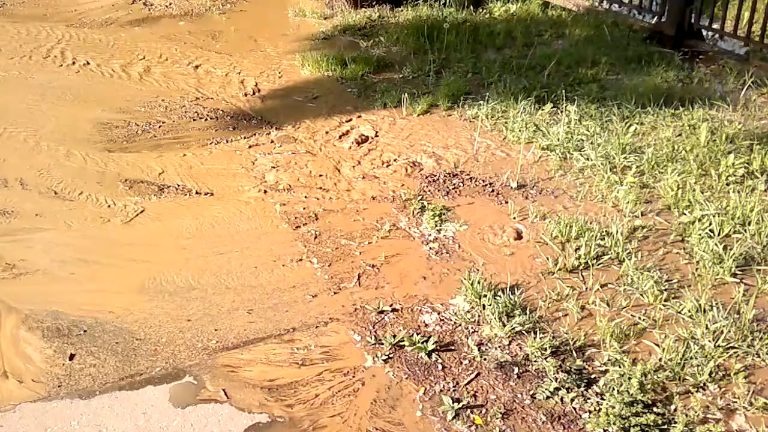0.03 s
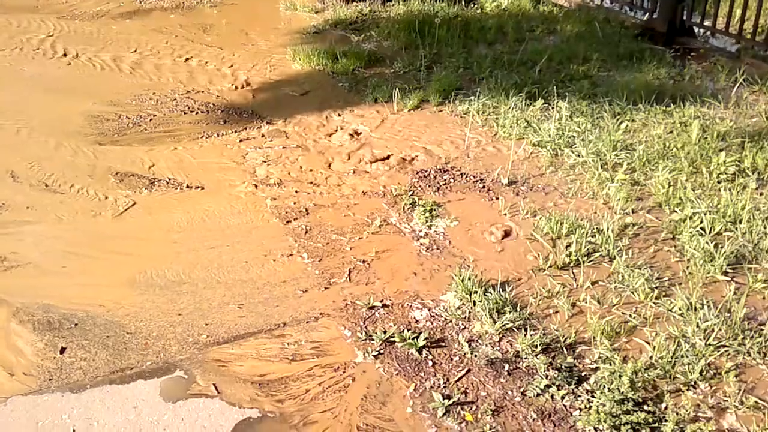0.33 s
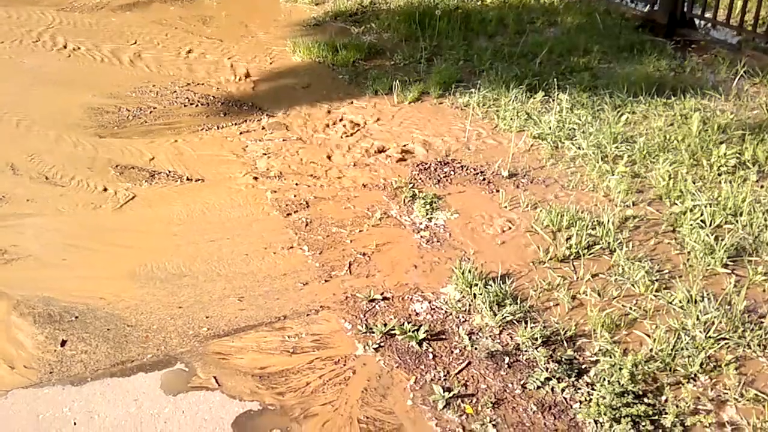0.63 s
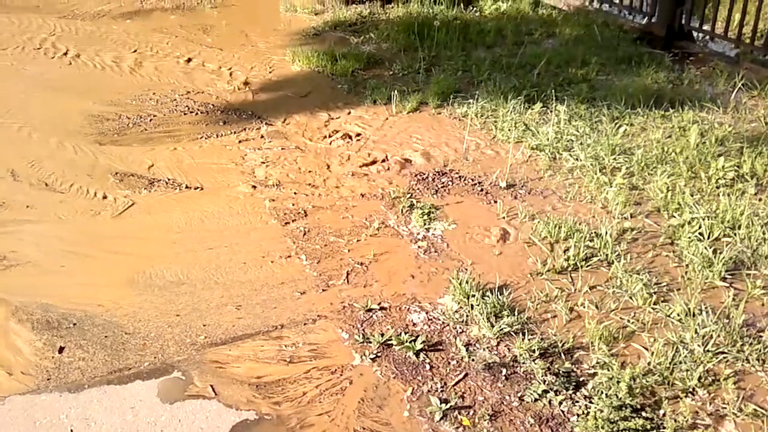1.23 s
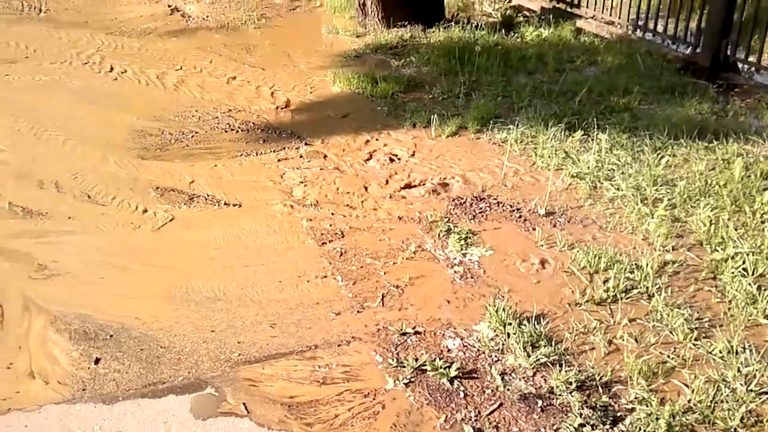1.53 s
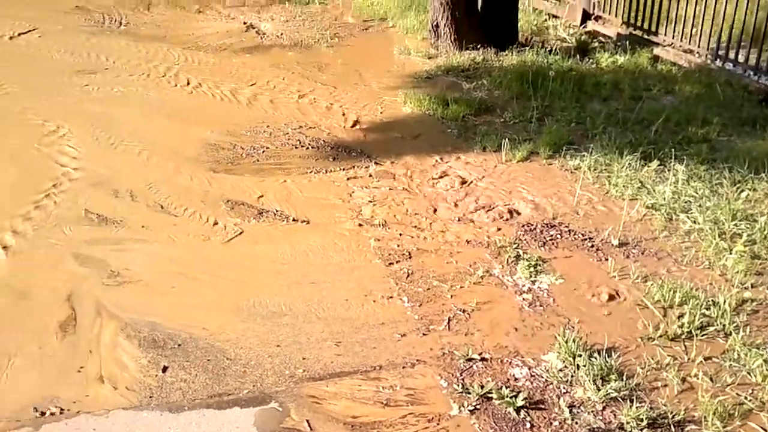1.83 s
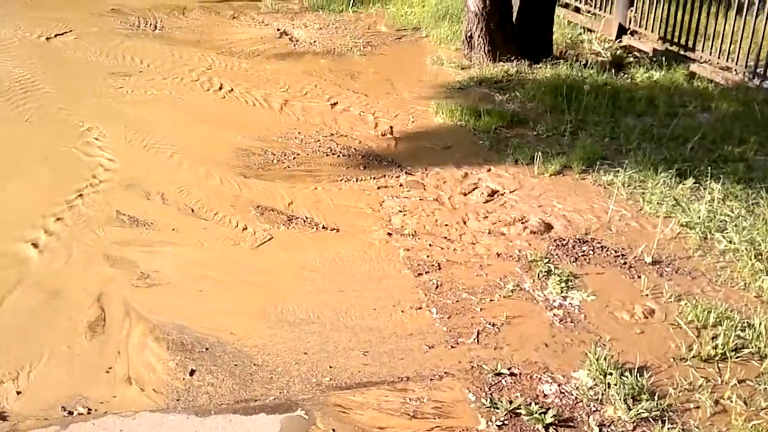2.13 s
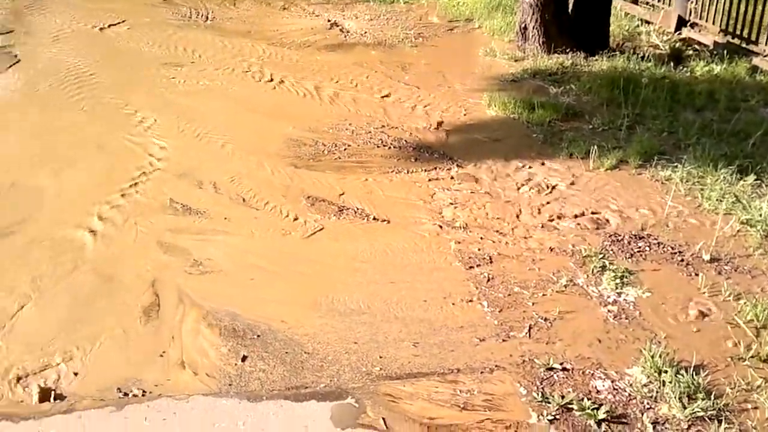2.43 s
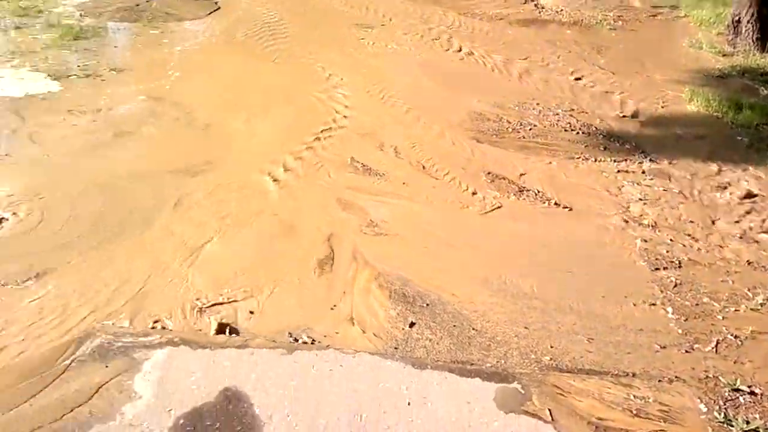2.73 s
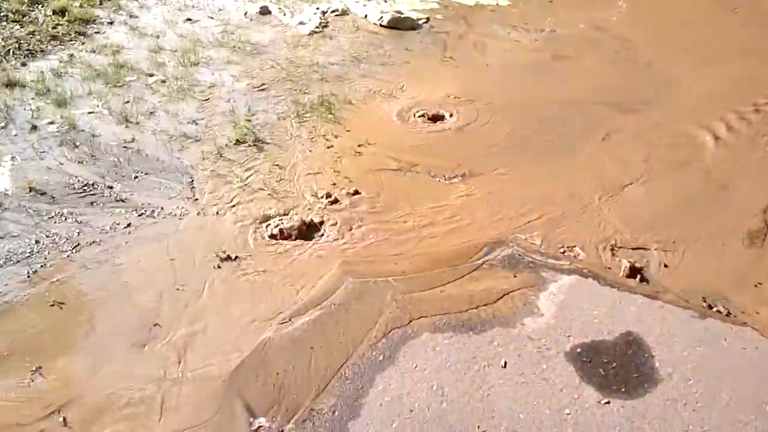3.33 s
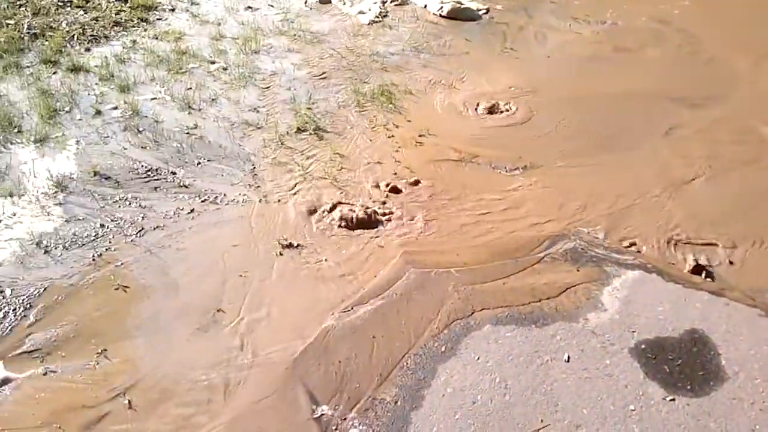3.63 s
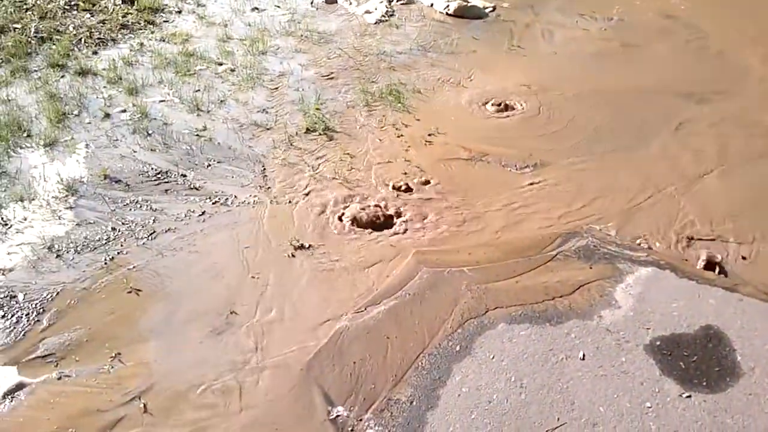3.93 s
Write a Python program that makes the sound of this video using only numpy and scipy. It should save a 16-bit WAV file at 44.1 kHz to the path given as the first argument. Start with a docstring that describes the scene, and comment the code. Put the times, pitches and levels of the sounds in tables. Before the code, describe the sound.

Muddy water wells up with a steady bubbling rush, over distant traffic rumble.

```python
"""Muddy water wells up and runs over flooded ground. Countless tiny bubbles, each ringing for an
instant, blend into a rush, with a few clear plips and wet spits on top. The water grows louder and
brighter as the microphone turns toward the welling spot. Behind it distant traffic rumbles and an
engine hum comes up late. Close by there are a few faint, crisp rustles."""
import sys
import numpy as np
from scipy import signal
from scipy.fft import rfft, irfft, next_fast_len
from scipy.io import wavfile
from scipy.ndimage import uniform_filter1d, map_coordinates

SR = 44100
rng = np.random.default_rng(int(sys.argv[2]) if len(sys.argv) > 2 else 0)


def materialize(psi):
    """Save the field psi as 16-bit PCM at rate SR to the path in sys.argv[1].

    A 1-D psi becomes a single channel; in a 2-D psi each row is a channel.
    """
    bounded = np.clip(np.atleast_2d(psi).T, -1, 1)
    quanta = np.round(bounded * 32767).astype(np.int16)
    wavfile.write(sys.argv[1], SR, quanta)


N = 176400  # 4 seconds

# Levels in the tables are relative: the functions add gains and filters.
# How loud the traffic is over time: t/s, rumble level/dB, roar level/dB
TRAFFIC_LEVELS = [(.3, -33, -39.5), (.55, -32, -37), (.75, -29.5, -37), (1.1, -32, -36.5),
                  (1.3, -29.5, -33), (1.45, -32, -34.5), (1.6, -29, -37.5), (2.05, -30.5, -35.7),
                  (2.35, -32.5, -35.5), (2.75, -32, -38.5), (3.1, -32, -35.5), (3.7, -29.5, -35),
                  (4.0, -33, -36.5)]
# Tone of the deep traffic rumble: f/Hz, level/dB
RUMBLE_SPECTRUM = [(5, -62), (12, -17), (20, 4), (32, -7.5), (43, 7), (54, 9), (68, 9), (78, 3.5), (135, 4),
                   (175, -12.5), (350, -58), (1200, -120)]
# Tone of the tyre and engine roar: f/Hz, level/dB
ROAR_SPECTRUM = [(20, -70), (90, -14.5), (170, 0.5), (260, -1), (330, -6), (450, -9.5), (600, -15.5),
                 (900, -37), (2000, -58), (4000, -120)]
# Engine notes: f/Hz, level/dB, swell t/s, fade t/s, pitch rise/(Hz per s)
ENGINE_NOTES = [(219, -36.5, 3.35, 4.5, 1.8), (249, -43, 3.35, 3.9, 4), (358.7, -46.5, 2.7, 3.51, 13.8)]
# Faint rustles: t/s, half length/s, level/dB, centre f/Hz
RUSTLE_EVENTS = [(.745, 0.018, -78, 12000), (.882, .02, -75, 10900), (1.217, .016, -70, 13500),
                 (1.47, .045, -79, 11000), (2.015, 0.017, -76, 11000), (3.196, 0.022, -66, 10400)]
# Single ticks in the rustles: t/s, level/dB
TICK_EVENTS = [(.8787, -63), (1.2012, -66), (1.2168, -61), (2.003, -66), (2.0207, -65), (3.1546, -63),
               (3.1735, -53), (3.1943, -54), (3.203, -51), (3.2092, -58)]
# Tone of the ticks and droplets: f/Hz, level/dB
TICK_SPECTRUM = [(3000, -40), (6000, -1), (9500, -5.5), (11500, 0), (13000, -8), (15000, -25)]
# How loud the droplets are over time: t/s, level/dB
SPATTER_LEVELS = [(.55, -94), (1.4, -87), (2.4, -83), (3.0, -82.5), (3.5, -91), (4.0, -94)]
# Bursting bubbles: t/s, level/dB
SPIT_EVENTS = [(.5508, -54), (0.878, -51), (1.094, -59), (1.609, -51), (2.143, -54), (2.323, -59),
               (2.588, -50), (2.606, -52), (2.675, -58), (2.91, -52), (3.174, -55), (3.334, -57),
               (3.627, -45.5), (3.785, -49), (3.81, -47.5)]
# Tone of a bursting bubble: f/Hz, level/dB
SPIT_SPECTRUM = [(500, -64), (1500, -30), (3200, 12), (5400, -7), (6500, -9), (8000, -19), (11000, -34),
                 (15000, -54)]
# Clear single bubbles: t/s, starting f/Hz, level/dB, life/s
PLIP_EVENTS = [(.424, 680, -35.5, 0.044), (.487, 2580, -36, .012), (.5508, 2900, -28.5, 0.0047),
               (0.704, 3000, -30, 0.0035), (0.8323, 2320, -31.5, 0.013), (1.1918, 2520, -33, 0.0072),
               (1.201, 3130, -35.5, 0.0071), (1.3695, 2700, -31.5, 0.007), (1.387, 3400, -39.5, 0.013),
               (1.507, 5570, -47, 0.0033), (1.596, 3060, -35, .006), (1.766, 2240, -31, 0.0088),
               (1.87, 3700, -46, 0.0081), (1.934, 2770, -34, 0.01), (2.666, 3300, -37, .004),
               (2.932, 2540, -31, 0.0064), (3.144, 3330, -35, 0.0048), (3.222, 2880, -37, 0.0077),
               (3.939, 4640, -34.5, 0.0078)]
# How loud the water is over time: t/s, rush level/dB, babble level/dB, fizz level/dB
WATER_LEVELS = [(.3, -42.5, -42, -62.5), (.55, -43.5, -42.5, -61.5), (1.05, -42.5, -42.5, -61),
                (1.5, -42.8, -42.5, -61), (1.88, -43, -42.5, -60.5), (2.2, -41, -42, -59.5),
                (2.5, -42, -42, -58.5), (2.8, -40.8, -42, -58.5), (3.05, -41, -39.5, -57),
                (3.4, -39.5, -40, -57), (3.6, -39, -41, -55.5), (3.82, -39.5, -40, -55),
                (4.0, -39, -42, -56.5)]
# Tone of the water's low rush: f/Hz, level/dB
RUSH_SPECTRUM = [(60, -60), (250, -9), (500, -2.5), (720, -3.5), (1020, 1), (1350, -2.5), (1700, -11.5),
                 (2300, -28), (4000, -54), (7000, -120)]
# Tone of its brighter babble: f/Hz, level/dB
BABBLE_SPECTRUM = [(200, -120), (700, -17), (1200, -8.5), (1600, 0.5), (2150, -1), (2600, -4.5),
                   (3200, -14), (4000, -30), (6000, -48), (9000, -120)]
# Tone of its high fizz: f/Hz, level/dB
FIZZ_SPECTRUM = [(600, -120), (1500, -33), (3000, 1), (4000, -1.5), (5000, -1), (5550, -8), (6050, -19),
                 (7500, -20), (8500, -27.5), (9600, -28), (11200, -26), (13500, -31), (15500, -44)]

RUMBLE_DB, ROAR_DB, TICK_DB, SPIT_DB, PLIP_DB = 1.37, .5, 11, 11.5, 5.5
RUSH_DB, BABBLE_DB, FIZZ_DB = -.5, -1, 1.5  # gains of the noise in the water
FROTH_DB, SPRAY_DB = -7, -6.5  # gains of the bubbles in it
BUBBLE_RISE = .096  # a bubble's pitch climbs by this fraction over its life
START_S, FADE_IN_S, FADE_OUT_S, TOP_HZ = .2689, .034, .002, 15650


def amp(db):
    """Turn decibels into a number to multiply by."""
    return 10 ** (np.asarray(db) / 20)


def unit(x):
    """Scale to an average strength (rms) of 1."""
    return x / np.sqrt(np.mean(x ** 2) + 1e-20)


def clock():
    """The time of each sample in seconds."""
    return np.arange(N) / SR


def curves(rows):
    """Join a table's points in time with straight lines, one curve per level column."""
    times, *columns = np.transpose(rows)
    return [np.interp(clock(), times, column) for column in columns]


def wobble(per_s):
    """A smooth curve through per_s random values a second."""
    return map_coordinates(rng.standard_normal(int(N * per_s / SR) + 4), [clock() * per_s])


def filtered(x, response):
    """Scale each frequency in x by response(hz)."""
    size = next_fast_len(N + SR // 2)
    return irfft(rfft(x, size) * response(np.fft.rfftfreq(size, 1 / SR)), size)[:N]


def coloured(x, spectrum):
    """Shape the tone of x with a table of f/Hz, level/dB."""
    f, db = np.transpose(spectrum)
    return filtered(x, lambda hz: amp(np.interp(np.log(hz + 1), np.log(f), db)))


def noise(spectrum, patchy_db):
    """Shaped noise with random louder and softer patches across pitch and time."""
    slices = signal.stft(rng.standard_normal(N), nperseg=512)[2]
    patches = uniform_filter1d(rng.standard_normal(slices.shape), 6, axis=0)
    patches = unit(uniform_filter1d(patches, 10, axis=1))
    uneven = signal.istft(slices * amp(patchy_db * patches), nperseg=512)[1][:N]
    return unit(coloured(uneven, spectrum))


def snaps(rows, rise_s, fall_s):
    """A burst of noise for each row of t/s, level/dB; it falls 60 dB in fall_s."""
    envelope = np.zeros(N)
    for start, db in rows:
        age = np.maximum(clock() - start, 0)
        envelope += (1 - np.exp(-age / rise_s)) * amp(db - 60 * age / fall_s)
    return envelope * rng.standard_normal(N)


def bubbles(starts, hz, gain, life):
    """Each bubble rings as a tone that starts softly, climbs and falls 40 dB over its life."""
    samples = np.arange(min(int(life.max() * SR) + 2, SR // 40))
    t, hz, life = samples / SR, hz[:, None], life[:, None]
    tone = np.sin(2 * np.pi * hz * t * (1 + BUBBLE_RISE * t / life / 2))
    ring = gain[:, None] * tone * (1 - np.exp(-t * hz)) * 10 ** (-2 * t / life)
    positions = (starts * SR).astype(int)[:, None] + samples
    return np.bincount(positions.ravel(), ring.ravel(), N)[:N]  # add each ring at its own time


def swarm(per_s, low_hz, high_hz, cycles, spread_db):
    """Many tiny rings of random time, pitch and strength, each about `cycles` vibrations long."""
    when, pitch, size, length = rng.random((int(per_s * N / SR), 4)).T
    hz = low_hz * (high_hz / low_hz) ** pitch
    gain = amp(-spread_db * np.log(1 - .98 * size)) * hz / high_hz  # many weak, a few strong
    return bubbles(when * N / SR, hz, gain, life=cycles * (.5 + length) / hz)


def traffic():
    """Far-off tyres and engines blur into a deep rumble and a low roar."""
    rumble_db, roar_db = curves(TRAFFIC_LEVELS)
    rumble = amp(rumble_db + RUMBLE_DB) * noise(RUMBLE_SPECTRUM, patchy_db=-.5)
    roar = amp(roar_db + ROAR_DB) * noise(ROAR_SPECTRUM, patchy_db=.66)
    return rumble + roar


def engine_hum(swell_s=.22):
    """Distant engine notes swell, creep up in pitch and fade."""
    t, hum = clock(), np.zeros(N)
    waver = 1 + .007 * wobble(6)
    for hz, db, start, end, rise in ENGINE_NOTES:
        pitch = (hz + rise * (t - start)) * waver
        note = np.sqrt(2) * np.sin(2 * np.pi * np.cumsum(pitch) / SR)
        swell = (1 + np.tanh((t - start) / swell_s)) / 2
        fade = (1 - np.tanh((t - end) / swell_s)) / 2
        hum += amp(db + wobble(5.34)) * swell * fade * note
    return hum


def rustles(width_hz=2900):
    """Brief clusters of tiny high crackles, each around its own pitch."""
    crackle = swarm(per_s=2200, low_hz=6000, high_hz=15000, cycles=2, spread_db=3.5)
    sound = np.zeros(N)
    for middle, half_s, db, centre_hz in RUSTLE_EVENTS:
        band = filtered(crackle, lambda hz: np.exp(-.5 * ((hz - centre_hz) / width_hz) ** 2))
        swell = np.exp(-.5 * ((clock() - middle) / half_s) ** 2)
        sound += amp(db) * swell * unit(band)
    return sound


def ticks():
    """The sharpest crackles stand out of the rustles one by one."""
    return amp(TICK_DB) * coloured(snaps(TICK_EVENTS, rise_s=.0001, fall_s=.006), TICK_SPECTRUM)


def spatter():
    """A fine sprinkle of droplets, too small to pick out singly."""
    level_db, = curves(SPATTER_LEVELS)
    drops = swarm(per_s=420, low_hz=7000, high_hz=12500, cycles=11, spread_db=1.8)
    return amp(level_db) * unit(coloured(drops, TICK_SPECTRUM))


def spits():
    """A bubble's thin skin bursts with a short wet hiss."""
    return amp(SPIT_DB) * coloured(snaps(SPIT_EVENTS, rise_s=.0007, fall_s=.022), SPIT_SPECTRUM)


def plips():
    """Single nearby bubbles ring out clearly above the rush."""
    starts, hz, db, life = np.transpose(PLIP_EVENTS)
    return bubbles(starts, hz, amp(db + PLIP_DB), life)


def water(flicker_db=.42):
    """Welling water: a low rush, a brighter babble and a bursting fizz, each noise plus bubbles."""
    gurgle = swarm(per_s=1100, low_hz=519, high_hz=1854, cycles=7.8, spread_db=5.5)
    froth = swarm(per_s=2200, low_hz=1304, high_hz=3790, cycles=7.8, spread_db=1.5)
    spray = swarm(per_s=650, low_hz=2730, high_hz=9000, cycles=8.7, spread_db=3)
    rush = amp(RUSH_DB) * noise(RUSH_SPECTRUM, patchy_db=.46)
    rush += amp(FROTH_DB) * unit(coloured(gurgle, RUSH_SPECTRUM))
    babble = amp(BABBLE_DB) * noise(BABBLE_SPECTRUM, patchy_db=.94)
    babble += amp(FROTH_DB) * unit(coloured(froth, BABBLE_SPECTRUM))
    fizz = amp(FIZZ_DB) * noise(FIZZ_SPECTRUM, patchy_db=2.5)
    fizz += amp(SPRAY_DB) * unit(coloured(spray, FIZZ_SPECTRUM))
    layers = zip(curves(WATER_LEVELS), (rush, babble, fizz))
    return sum(amp(db + flicker_db * wobble(14)) * layer for db, layer in layers)


def scene():
    """All the sounds add up at one microphone."""
    return (water() + spatter() + plips() + spits() + rustles() + ticks() + traffic() + engine_hum())[None]


def record(dry):
    """The sound cuts in after a moment, ends without a click and has nothing above TOP_HZ."""
    fade_in = np.clip((clock() - START_S) / FADE_IN_S, 0, 1)
    fade_out = np.clip((N / SR - clock()) / FADE_OUT_S, 0, 1)
    return filtered(dry[0] * fade_in * fade_out, lambda hz: hz < TOP_HZ)[None]


dry = scene()
out = record(dry)
materialize(out)
```